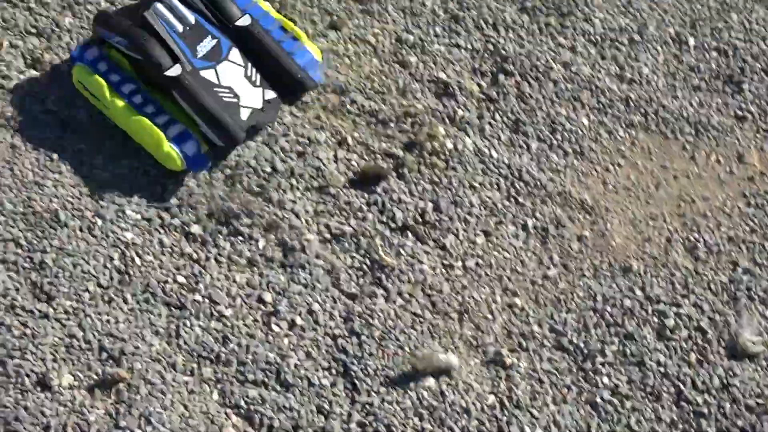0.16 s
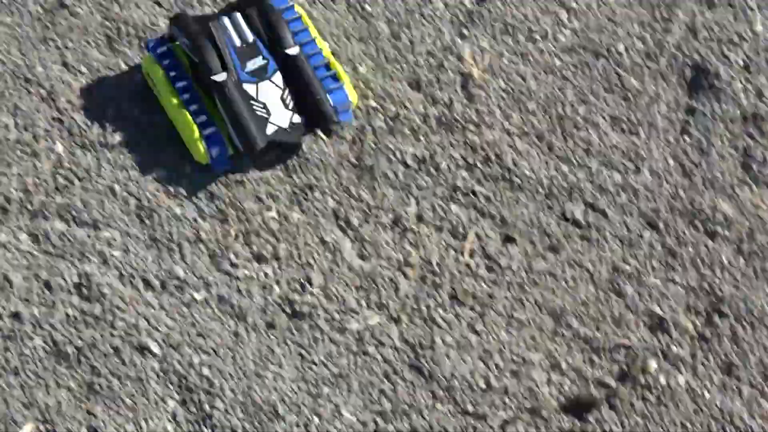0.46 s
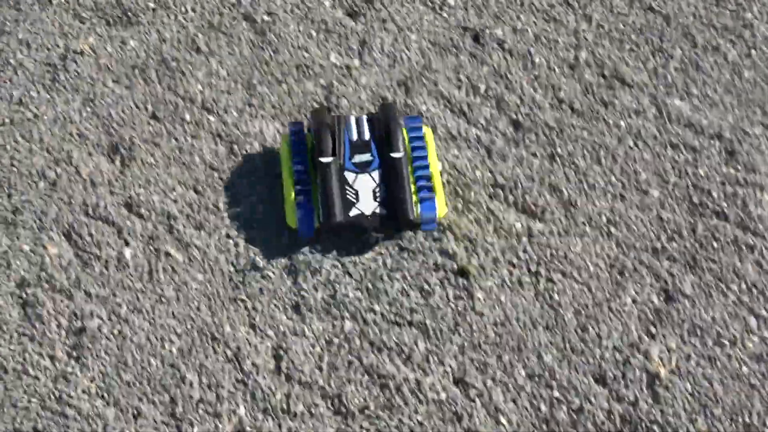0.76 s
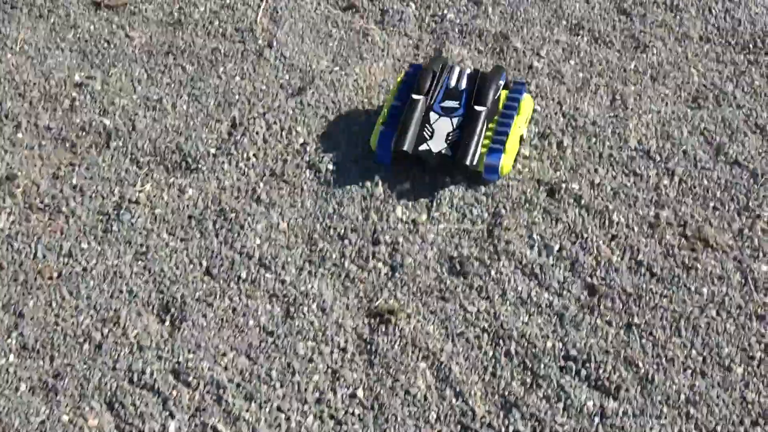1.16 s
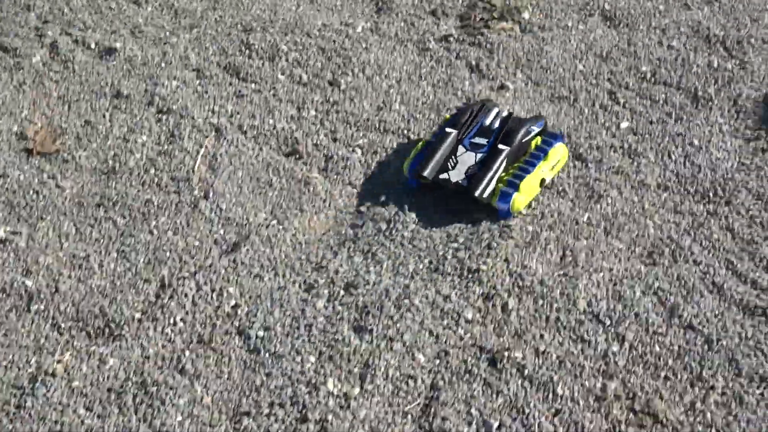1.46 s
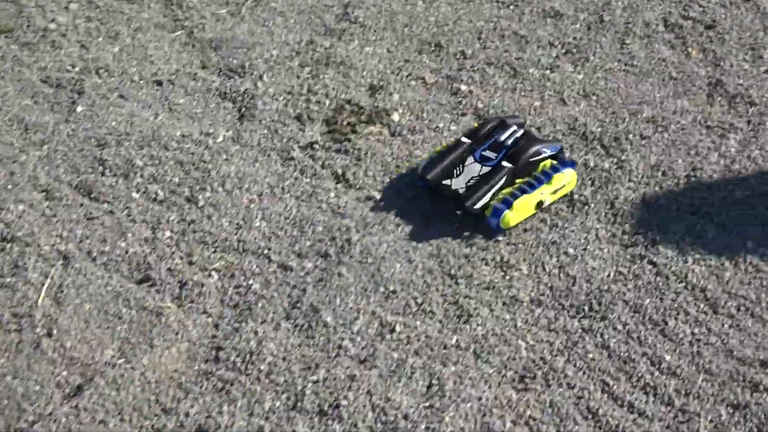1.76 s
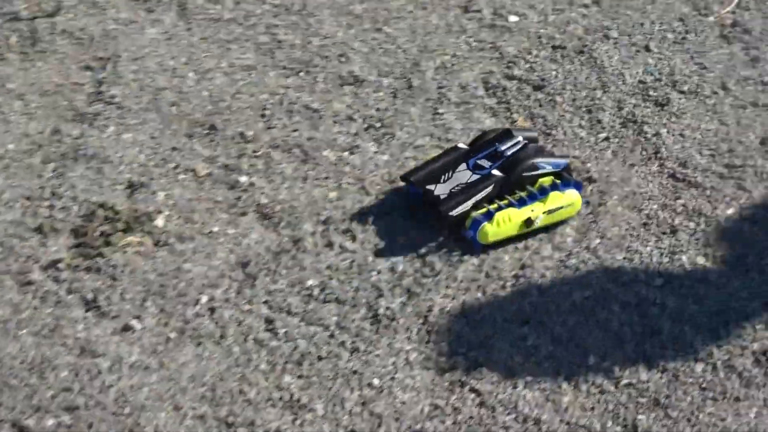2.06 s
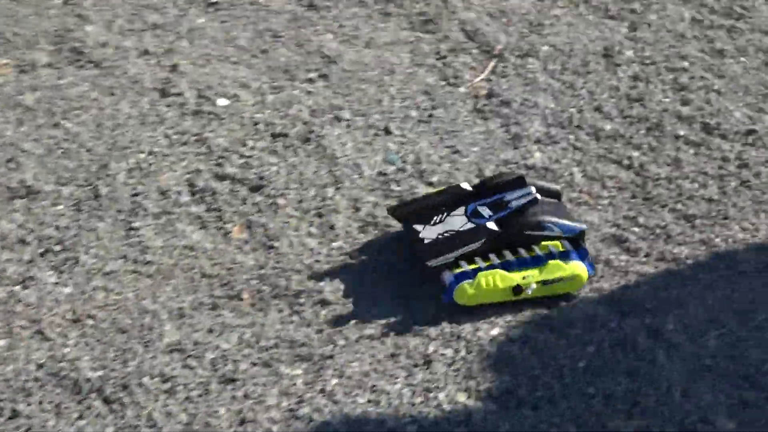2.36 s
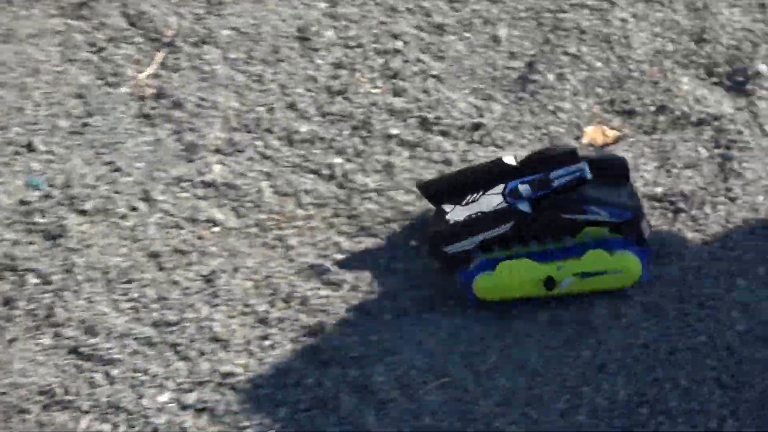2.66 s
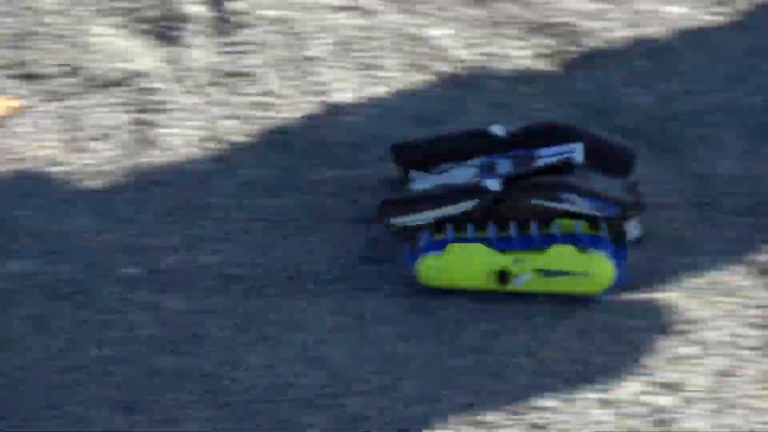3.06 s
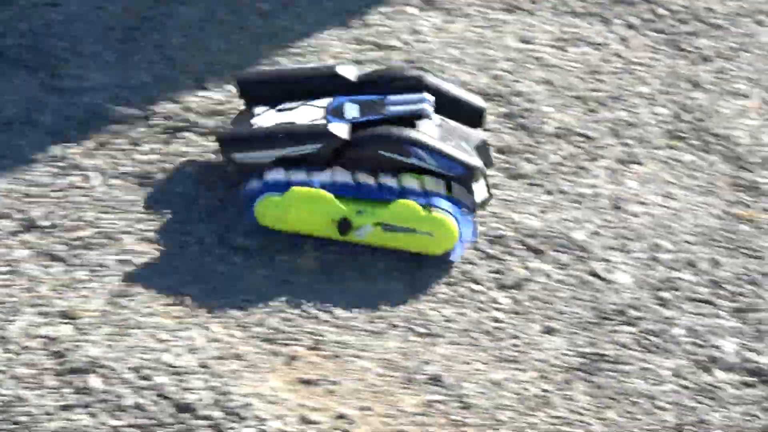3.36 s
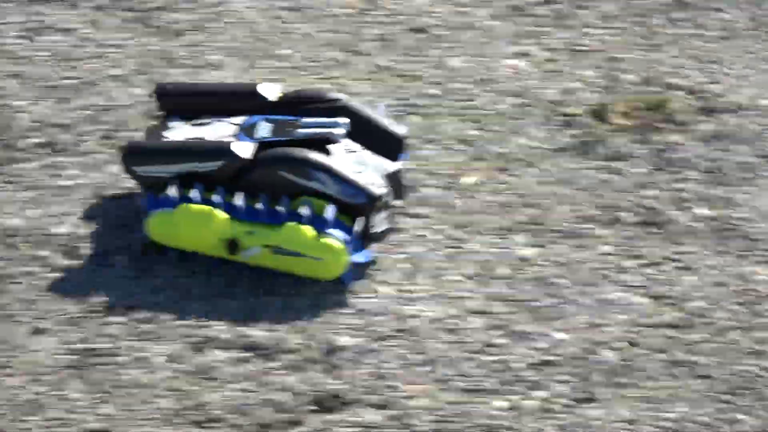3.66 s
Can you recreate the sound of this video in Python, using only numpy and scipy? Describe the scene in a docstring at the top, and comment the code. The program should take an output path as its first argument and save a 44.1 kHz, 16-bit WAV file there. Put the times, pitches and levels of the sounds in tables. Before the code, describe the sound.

A small remote-controlled toy vehicle whines and rattles over gravel outdoors, then stops.

```python
"""Outdoors, a hand-held camera close to a small tracked toy on gravel. From the start its gear mesh and
motors whine with a fast wobble over the rattling housing, and wind buffets the microphone above a distant
haze. The treads stir grit, tick against stones and skid, hardest at 1.2 s. A puff bumps the microphone
at 2.75 s and a stone cracks sharply near 3 s. At about 3.6 s the drive is cut: the whines sag and die,
leaving a rustle and the wind."""
import sys
import numpy as np
from scipy import signal
from scipy.fft import rfft, irfft
from scipy.io import wavfile

SR = 44100
rng = np.random.default_rng(int(sys.argv[2]) if len(sys.argv) > 2 else 0)


def pcm_store(signal):
    """Save signal as 16-bit PCM."""
    levels = np.round(np.clip(np.atleast_2d(signal), -1, 1) * 32767)
    wavfile.write(sys.argv[1], SR, levels.astype(np.int16).T)


N = 167580
TIME = np.arange(N) / SR


def amp(db):
    return 10 ** (np.asarray(db) / 20)


def unit_rms(x):
    return x / np.sqrt(np.mean(x ** 2) + 1e-20)


def curve(rows, column=1):
    """One column of a table, joined by straight lines in time."""
    rows = np.asarray(rows)
    return np.interp(TIME, rows[:, 0], rows[:, column])


def colour(x, points, scale=1):
    """Filters by (Hz, dB) points joined on a log-frequency axis."""
    point_hz, point_db = np.transpose(points)
    hz = np.fft.rfftfreq(N, 1 / SR)
    gain_db = np.interp(np.log(hz + 1), np.log(point_hz + 1), point_db)
    return irfft(rfft(x) * amp(scale * gain_db), N)


def drift(top_hz):
    """A random wander of rms 1, mostly below top_hz."""
    lowpass = signal.butter(2, top_hz, fs=SR, output="sos")
    return unit_rms(signal.sosfilt(lowpass, rng.standard_normal(N)))


def resonate(x, hz, width_hz):
    """A resonance of gain 1 at a steady or moving pitch."""
    carrier = np.exp(2j * np.pi * np.cumsum(hz * np.ones(N)) / SR)
    pole = np.exp(-np.pi * width_hz / SR)
    return 2 * (carrier * signal.lfilter([1 - pole], [1, -pole], x / carrier)).real


# The open air, far off. Each row: frequency in Hz, relative level in dB.
HAZE_COLOUR = [(35, -44), (60, -1.5), (139, -11), (180, -7), (308, -8.5), (480, -9.5), (767, -13.5),
               (882, -12), (2840, -18), (11800, -50), (16000, -42)]


def haze():
    """Distant outdoor noise, nearly steady."""
    noise = colour(rng.standard_normal(N), HAZE_COLOUR + [(22000, -60)])
    return amp(-45) * unit_rms(noise * amp(0.76 * drift(7.4)))


# Gusts on the microphone. Each row: time in seconds, relative level in dB.
GUSTS = [(0.0, -42), (0.05, -30), (0.07, -61), (0.09, -34.5), (0.18, -44), (0.2, -37), (0.59, -45.5),
         (0.62, -31.5), (0.78, -49), (0.86, -41), (1.22, -53), (1.32, -46), (1.9, -44.5), (2.09, -53),
         (2.15, -43), (2.65, -45), (2.76, -30.5), (2.84, -42.5), (3.53, -42.5), (3.65, -47), (3.75, -41),
         (3.8, -43)]
# Their spectrum. Each row: frequency in Hz, relative level in dB.
GUST_COLOUR = [(38, -50), (65, 2), (166, -0.5), (343, -10.5), (425, -27.5), (500, -28), (650, -40),
               (1100, -120)]
# Deep buffets on the microphone. Each row: time in seconds, level in dB.
BUFFETS = [(0.0, -55), (0.13, -35), (0.21, -40), (0.27, -33), (0.49, -45.5), (0.53, -59), (0.56, -44),
           (0.73, -40), (0.75, -51), (1.29, -59), (2.11, -59), (2.26, -41.5), (2.33, -57), (2.4, -50),
           (2.63, -73), (2.71, -45), (3.44, -64), (3.8, -43)]
# One puff. In order: start in seconds, peak envelope in dB, pitch in Hz, length in seconds.
PUFF = (2.75, -23, 118, .03)


def wind():
    """Air striking the microphone: lumpy gusts, a deeper rumble and one bump."""
    start, db, hz, length = PUFF
    progress = np.clip((TIME - start) / length, 0, 1)
    bump = amp(db) * np.sin(np.pi * progress) ** 2 * np.sin(2 * np.pi * hz * length * progress)
    gusts = unit_rms(colour(rng.standard_normal(N), GUST_COLOUR) * amp(1.4 * drift(26)))
    rumble = colour(rng.standard_normal(N), [(8, -28), (20, -2), (50, -5.5), (90, -12), (200, -62)])
    return bump + amp(curve(BUFFETS)) * unit_rms(rumble) + amp(curve(GUSTS) - 1.5) * gusts


# Treads skidding on loose stones. Each row: start in seconds, length in seconds, level in dB.
SKIDS = [(0.614, 0.071, -44), (1.159, 0.12, -36), (3.13, .04, -39), (3.387, .05, -41.5)]
# The crunch of a skid. Each row: frequency in Hz, relative level in dB.
SKID_COLOUR = [(240, -48), (400, -18), (839, -1), (1270, -6), (1580, -11), (1900, -12), (4510, -15.5),
               (6540, -3), (16000, -37.5)]
# The hiss of stirred grit, heard close. Each row: time in seconds, level in dB.
GRIT_HISS = [(0.0, -52), (0.02, -68), (0.5, -50), (0.59, -70), (1.08, -66), (1.24, -54), (1.33, -55),
             (1.64, -55.5), (3.46, -52.5), (3.69, -51), (3.8, -48.5)]


def gravel(grains_per_s=4500):
    """Dense tiny impacts under the treads crunch in the skids and hiss in the treble."""
    grain_db = np.minimum(rng.exponential(1, N), 5)
    impacts = amp(grain_db) * (rng.random(N) < grains_per_s / SR)
    grains = unit_rms(impacts * rng.choice([-1., 1.], N)) + 0.49 * rng.standard_normal(N)
    skidding = np.zeros(N)
    for start, length, db in SKIDS:
        progress = np.clip((TIME - start) / length, 0, 1)
        skidding += amp(db) * np.sqrt(np.clip(np.sin(np.pi * progress), 0, 1))
    crunch = unit_rms(colour(grains, SKID_COLOUR))
    hiss = unit_rms(colour(grains, [(6300, -10), (8000, 2), (13000, -6.5), (16000, -5)]))
    return skidding * crunch + amp(curve(GRIT_HISS) + 1.9 * drift(50)) * hiss


# Stones near the microphone, one ring to a row.
# Each row: start in seconds, level in dB, pitch in Hz, seconds to fall by 60 dB.
STONE_RINGS = [(.487, -30, 7005, 0.0046), (.613, -32, 3800, 0.0075), (.98, -22, 1892, 0.011),
               (1.18, -19.5, 1188, 0.011), (1.316, -28.5, 3030, .05), (1.759, -23, 3048, 0.033),
               (2.987, -16, 4100, 0.0097), (2.9874, -21, 1099, 0.014), (2.989, -19, 2800, .005),
               (2.989, -27, 6200, 0.024), (2.987, -34, 8800, 0.014), (2.987, -37, 11800, .012),
               (3.41, -21, 1300, 0.016), (3.481, -31, 2190, 0.013), (3.73, -39, 11800, .015)]


def stones():
    """Stones knocked by the treads ring briefly as damped sines."""
    knocks = np.zeros(N)
    for start, db, hz, t60 in STONE_RINGS:
        age = np.maximum(TIME - start, 0)
        attack = np.minimum(age / 0.00038, 1)
        knocks += attack * amp(db - 60 * age / t60) * np.sin(2 * np.pi * hz * age)
    return knocks


def run_down(cut_s=3.57, coast_s=0.12):
    """The tracks coast after the drive is cut: 0 while driving, 1 once stopped."""
    return np.clip((TIME - cut_s) / coast_s, 0, 1)


def drive_gain():
    """The drive holds its level early in the coast, then drops by 38 dB."""
    return amp(-38 * run_down() ** 4.9)


# The rattle of the toy's housing. Each row: time in seconds, relative level in dB.
RATTLE = [(0, -42.5), (.8, -44.5), (1.6, -45.5), (2.4, -45), (3.0, -44), (3.6, -41)]
# Its spectrum. Each row: frequency in Hz, relative level in dB.
HOUSING_COLOUR = [(290, -45), (500, -6.5), (729, -11), (1260, -4), (1790, -3), (2290, -9.5), (2540, -15.5),
                  (3250, -10.5), (4210, -11), (5880, -5.5), (8090, -20.5), (14500, -56), (16000, -75)]
# Rings heard while their side of the housing faces the microphone.
# Each row: pitch in Hz, width in Hz, relative level in dB, start and end in seconds.
HOUSING_RINGS = [(3560, 130, -19.5, 2.5, 3.58), (10220, 180, -26.5, 1.8, 3.51), (11520, 430, -31, 2, 2.94),
                 (13800, 500, -24, 0.2, 0.81), (12640, 2700, -22.5, -0.8, 3.84), (14300, 530, -28, 3, 3.6)]
# One rasping ring. Each row: time in seconds, relative level in dB, centre in Hz.
RASP = [(0.0, -37, 2560), (0.12, -35.5, 2660), (1.01, -46, 2740), (1.27, -36.5, 2480), (1.35, -44, 2780),
        (1.95, -42.5, 2610), (3.3, -48.5, 2580), (3.6, -55, 2680)]


def housing(fade_s=0.33, settle_db=-8.5):
    """The drive shakes the housing, which rattles, rings and rasps; a rustle outlasts the cut."""
    shaking = rng.standard_normal(N) * amp(1.43 * drift(75))
    rings = np.zeros(N)
    for hz, width_hz, db, start, end in HOUSING_RINGS:
        facing = np.clip(np.minimum(TIME - start, end - TIME) / fade_s, 0, 1)
        rings += facing * amp(db + 2.9 * drift(24)) * unit_rms(resonate(shaking, hz, width_hz))
    body = unit_rms(colour(shaking, HOUSING_COLOUR))
    rattle = amp(curve(RATTLE)) * (amp(6) * body + amp(9) * rings)
    rasp = amp(curve(RASP) - 1.5) * unit_rms(resonate(shaking, curve(RASP, 2), width_hz=600))
    return amp(settle_db * run_down() ** 4.5) * rattle + drive_gain() * rasp


def whine(table, wobble, wander, throb_db, flutter_db, fuzz, width_hz, trim_db, shaft_hz=64):
    """An off-centre shaft bends and throbs a tone once a turn; fuzz is the noise's share of the power."""
    shaft_angle = 2 * np.pi * np.cumsum(shaft_hz * (1 + 0.2 * drift(12.08))) / SR
    glide = np.sin(shaft_angle) + 0.57 * np.sin(2 * shaft_angle)
    sag = 1 - 0.17 * run_down()
    centre_hz = curve(table, 2) * (1 + wander * drift(18)) * sag
    tone_hz = centre_hz * (1 + wobble * glide + 0.00423 * drift(328))
    tone = np.sin(2 * np.pi * np.cumsum(tone_hz) / SR)
    tone = unit_rms(tone * amp(flutter_db * drift(23) - throb_db * np.cos(shaft_angle)))
    band = resonate(rng.standard_normal(N), centre_hz, width_hz)
    band = unit_rms(resonate(band, centre_hz, width_hz))
    return amp(curve(table) + trim_db) * (np.sqrt(1 - fuzz) * tone + np.sqrt(fuzz) * band)


# The drive, close up: each track's gear mesh, a gear squeal and two motor whines.
# Each row: time in seconds, relative level in dB, pitch in Hz.
MAIN_MESH = [(0, -42, 1682), (.12, -33.5, 1717), (.25, -36.5, 1700), (.5, -45, 1720), (.62, -41, 1640),
             (.78, -45.5, 1557), (.92, -41.5, 1540), (1.05, -40.5, 1584), (1.24, -37.5, 1630),
             (1.3, -47, 1601), (1.36, -37.5, 1540), (1.5, -37, 1640), (1.75, -41, 1732), (1.95, -40, 1840),
             (2.1, -39.5, 1720), (2.27, -40, 1860), (2.44, -36.5, 1760), (2.52, -38, 1960),
             (2.62, -36.5, 1700), (2.75, -42.5, 1910), (2.82, -37, 1770), (3.05, -37, 1887),
             (3.25, -37.5, 1859), (3.5, -35.5, 1953), (3.6, -38, 1858)]
WEAK_MESH = [(0, -52, 1398), (.65, -47.5, 1302), (1.0, -46.5, 1750), (1.4, -49.5, 1421), (1.8, -39.5, 1520),
             (2.1, -41, 1580), (2.5, -46.5, 1649), (2.9, -48, 1703), (3.6, -44, 1750)]
GEAR_SQUEAL = [(0.0, -43, 5020), (0.04, -31, 5120), (0.08, -41, 5060), (0.66, -40, 5010), (0.71, -31, 4900),
               (0.755, -41, 4950), (0.79, -31.5, 5050), (0.82, -41, 4990), (0.97, -35, 5020),
               (1.34, -47, 5000), (1.42, -39, 5050), (1.9, -47, 4950), (2.2, -50.5, 4990),
               (3.51, -40.5, 4930), (3.6, -47, 4800)]
LOW_MOTOR = [(0.0, -38, 5650), (0.02, -42, 5420), (0.06, -30, 5460), (0.1, -41, 5480), (0.11, -33.5, 5470),
             (0.27, -34, 5520), (0.33, -41, 5210), (0.5, -37.5, 5450), (0.57, -44, 5640), (0.59, -40, 5620),
             (1.12, -42.5, 5580), (1.14, -41, 5540), (1.43, -43, 5510), (1.65, -46.5, 5310),
             (2.1, -39, 5713), (2.38, -43, 5650), (2.43, -34.5, 5580), (2.52, -47.5, 5750),
             (2.76, -40, 5920), (2.85, -43, 5550), (3.29, -38, 5550), (3.36, -36, 6000), (3.5, -47, 5600),
             (3.55, -34.5, 5650), (3.6, -46, 5610)]
HIGH_MOTOR = [(0.0, -34, 6130), (0.02, -37.5, 6420), (0.29, -40, 6600), (0.33, -34.5, 6420),
              (0.37, -37, 6430), (0.6, -37.5, 6320), (0.68, -42, 6500), (0.74, -31, 6480),
              (0.77, -38.5, 6500), (1.04, -41.5, 6600), (1.12, -32, 6350), (1.14, -37, 6464),
              (1.71, -48.5, 6495), (2.3, -40, 6200), (2.57, -44.5, 6280), (2.95, -41, 6320),
              (3.0, -45, 6070), (3.24, -45.5, 6500), (3.42, -35.5, 6170), (3.43, -44.5, 6390),
              (3.6, -43, 6200)]


def drive():
    """Meshing teeth sing in the midrange under three squeaky whines from gears and motors."""
    grind = np.clip((1920 - curve(MAIN_MESH, 2)) / 620, 0.12, 1)  # a slower mesh grinds more
    tones = whine(MAIN_MESH, wobble=0.028, wander=0.024, throb_db=2, flutter_db=2,
                  fuzz=grind, width_hz=300, trim_db=-1)
    tones += whine(WEAK_MESH, wobble=0.032, wander=0.03, throb_db=-3, flutter_db=3.5,
                   fuzz=0.26, width_hz=330, trim_db=-0.5)
    squeaky = dict(wobble=0.037, throb_db=4.5, flutter_db=3, fuzz=0.2)
    tones += whine(GEAR_SQUEAL, wander=0.015, width_hz=1100, trim_db=-2, **squeaky)
    tones += whine(LOW_MOTOR, wander=0.021, width_hz=1900, trim_db=0.5, **squeaky)
    tones += whine(HIGH_MOTOR, wander=0.021, width_hz=1400, trim_db=0.5, **squeaky)
    return drive_gain() * tones


# The toy's sound leans slightly right from about 2.4 to 3 s.
# Each row: time in seconds, left minus right in dB.
BRIEF_RIGHT_LEAN = [(0, 0), (2.35, 0), (2.5, -1.3), (2.95, -1.2), (3.1, 0)]
# Scattered sound, unlike at the two microphone ports. Each row: frequency in Hz, gain in dB.
SCATTER_COLOUR = [(60, -22), (300, -16), (900, -20), (1500, -51), (4800, -41), (6000, -19), (9500, -8),
                  (11300, -15), (12000, -55)]


def scene():
    """The toy close by, the air around it, and a scattered share that widens both."""
    toy = housing() + drive() + gravel() + stones()
    air = wind() + haze()
    lean = amp(curve(BRIEF_RIGHT_LEAN) / 2)
    spectra = signal.stft(toy + air, nperseg=512)[2]
    random_phase = np.exp(2j * np.pi * rng.random(spectra.shape))
    scattered = signal.istft(spectra * random_phase, nperseg=512)[1][:N]
    side = colour(np.sqrt(2) * scattered, SCATTER_COLOUR)
    return np.array([toy * lean + air + side, toy / lean + air - side])


# The balance of the microphone ports. Each row: frequency in Hz, left minus right in dB.
LOW_BALANCE = [(60, -1), (110, -1.5), (200, -3.5), (380, -6.5), (700, -7.5), (1290, -2.5)]
TREBLE_BALANCE = [(1600, 0), (4600, 0), (6000, -.7), (9500, -1.5), (11500, 0)]


def record(dry, edge_hz=15850):
    """The camera's microphone leans right in the low middle and cuts off the highest treble."""
    balance = LOW_BALANCE + TREBLE_BALANCE
    ports = np.array([colour(dry[0], balance, scale=0.5), colour(dry[1], balance, scale=-0.5)])
    lowpass = signal.firwin(1023, edge_hz, window=("kaiser", 12), fs=SR)
    return signal.oaconvolve(ports, lowpass[None], "same")


dry = scene()
out = record(dry)
pcm_store(out)
```